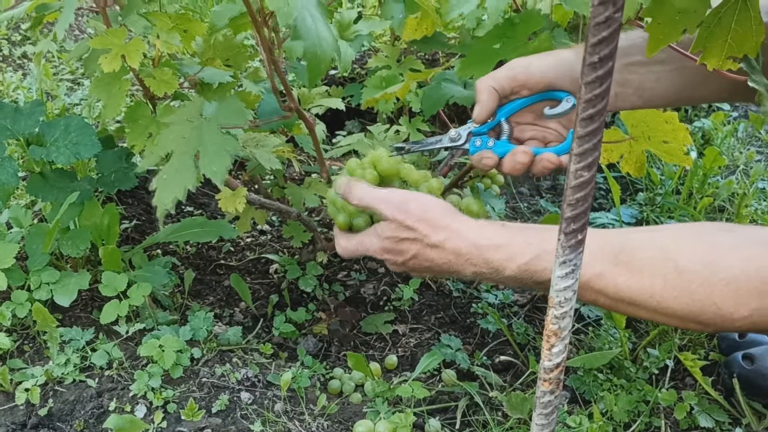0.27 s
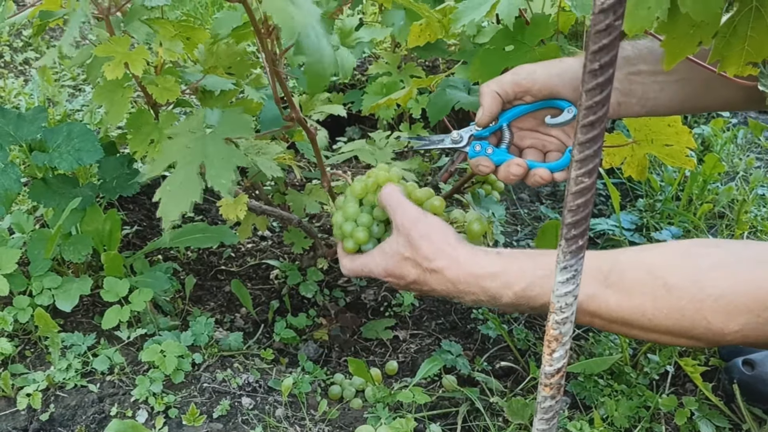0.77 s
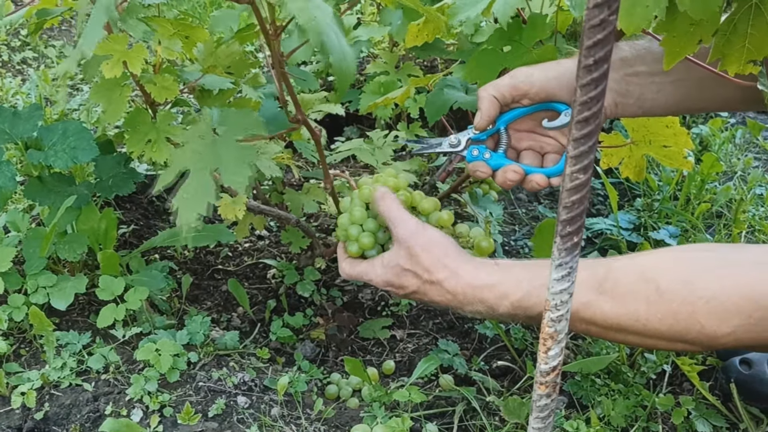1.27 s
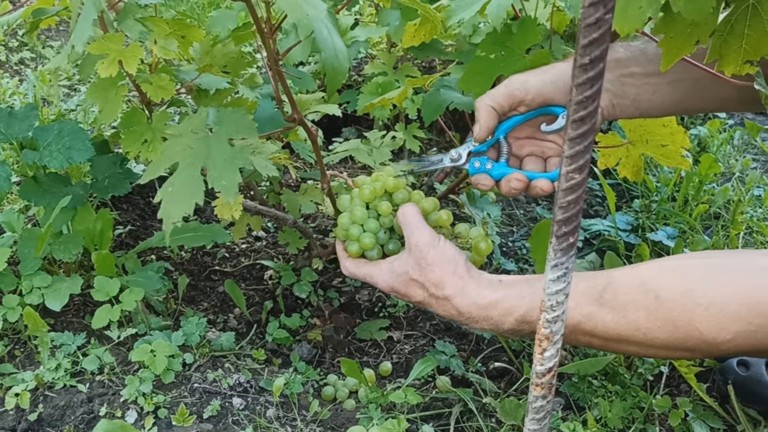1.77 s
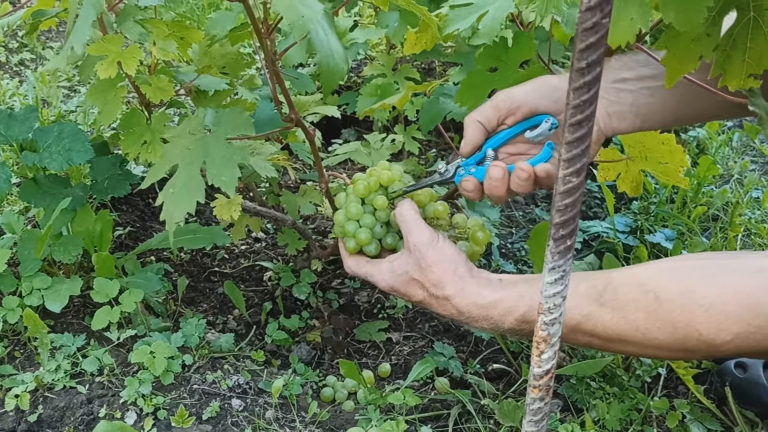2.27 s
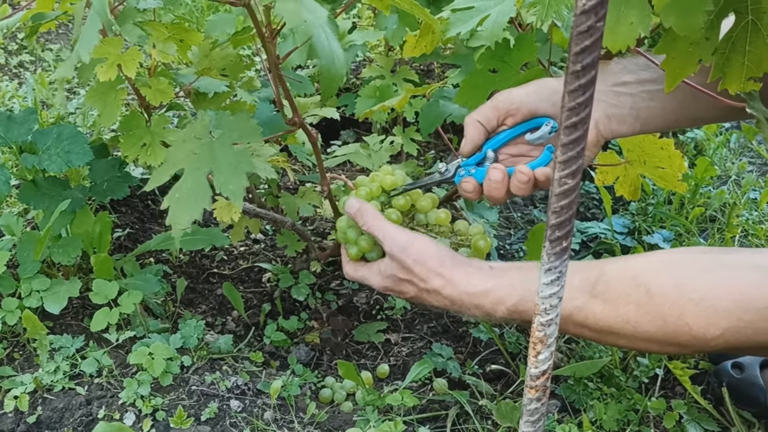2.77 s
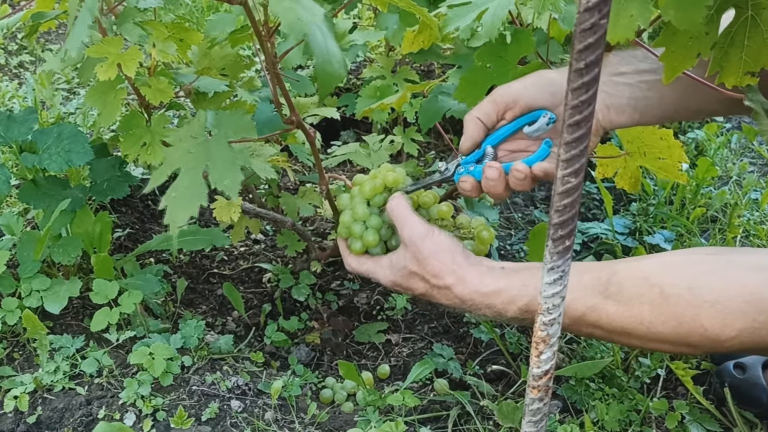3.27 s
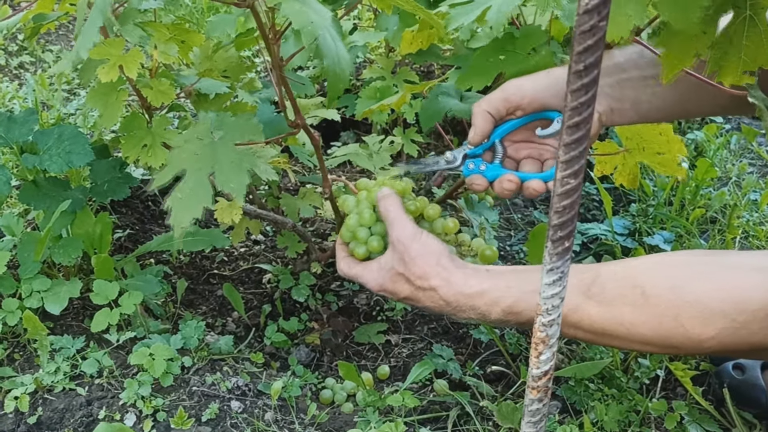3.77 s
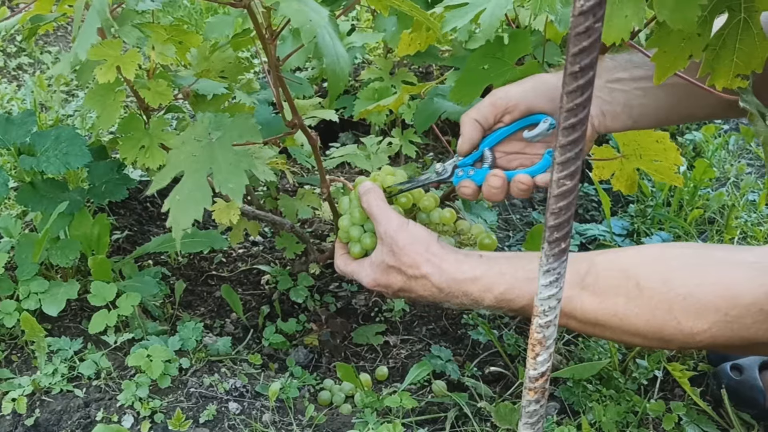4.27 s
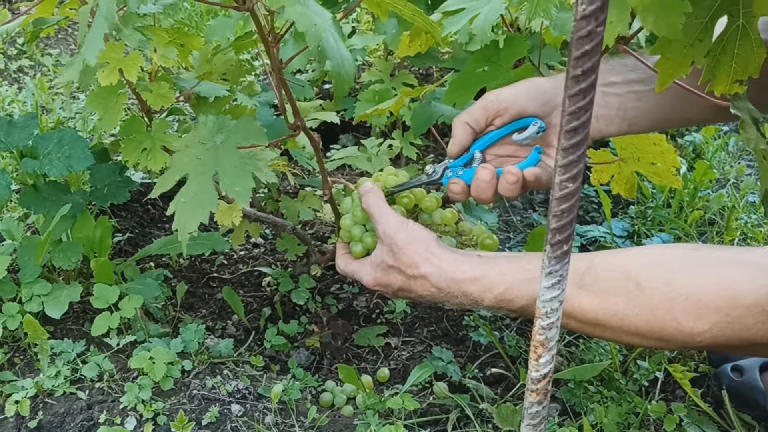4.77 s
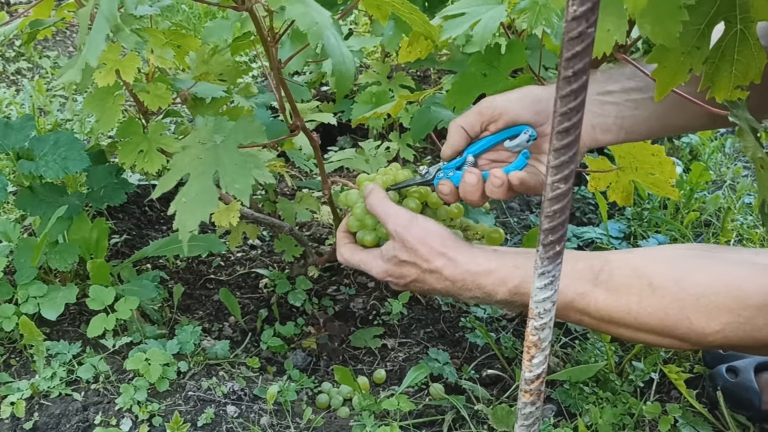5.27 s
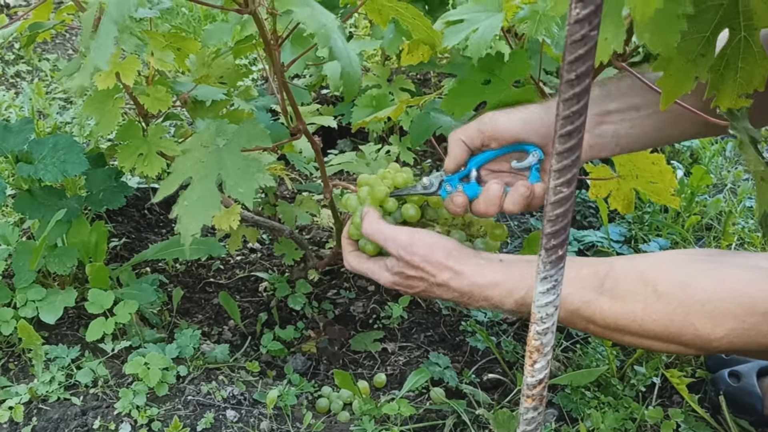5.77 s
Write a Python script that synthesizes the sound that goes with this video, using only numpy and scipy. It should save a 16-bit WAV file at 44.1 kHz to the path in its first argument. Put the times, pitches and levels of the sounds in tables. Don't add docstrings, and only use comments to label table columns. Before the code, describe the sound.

Small garden shears tick and nick faintly among grapes over distant traffic rumble and hiss, then shut with one sharp, bright metallic snip.

```python
import sys
import numpy as np
from scipy import signal
from scipy.io import wavfile
from scipy.ndimage import uniform_filter1d

SR = 44100
rng = np.random.default_rng(int(sys.argv[2]) if len(sys.argv) > 2 else 0)


def to_wav(s):
    ch = np.atleast_2d(s).T
    pcm = np.round(np.clip(ch, -1, 1) * 32767)
    wavfile.write(sys.argv[1], SR, pcm.astype(np.int16))


def nominal_scale(level):
    x = np.asarray(level, float) / 20
    return 10 ** x


N = 265261
LOW_CUT_HZ = 78


def evened(x):
    return x / np.sqrt(np.mean(x ** 2) + 1e-20)


def peaked(x):
    return x / abs(x).max()


def add(mix, s, sound):
    part = mix[round(s * SR):][:len(sound)]
    part += sound[:len(part)]


def band(x, lo_hz, hi_hz):
    return signal.sosfilt(signal.butter(2, [lo_hz, hi_hz], "band", fs=SR, output="sos"), x)


def ring(t, hz, t60):
    return np.sin(2 * np.pi * hz * t) * nominal_scale(-60 * t / t60)


# hz, density_db (dB per Hz)
AIR_SPECTRUM = [(40, -5.5), (70, 4), (93, -1), (217, -8), (455, -14), (821, -19.5), (1360, -22.5),
                (2200, -26.5), (2900, -30), (3600, -27), (4700, -30)]
# time_s, level_db
TRAFFIC_SWELL = [(0.0, -60.5), (0.6, -63), (1.42, -61), (1.56, -62.5), (4.75, -64), (6.01, -62)]


def air():
    frames, hz = N // 256 + 5, np.fft.rfftfreq(1024, 1 / SR)
    real, imaginary, patches = rng.standard_normal((frames, 513, 3)).T
    patches = uniform_filter1d(patches, size=10, axis=0)
    patches = evened(uniform_filter1d(patches, size=10, axis=1))
    spectrum_hz, density_db = np.transpose(AIR_SPECTRUM)
    swell_s, swell_db = np.transpose(TRAFFIC_SWELL)
    swell_db = np.interp(np.arange(frames) * 256 / SR, swell_s, swell_db - swell_db.mean())
    field_db = np.interp(np.log(hz + 1), np.log(spectrum_hz), density_db)[:, None] + 0.75 * patches
    field_db = field_db + swell_db / (1 + (hz[:, None] / 500) ** 2)
    spectra = (real + 1j * imaginary) * nominal_scale(field_db)
    wash = signal.istft(spectra, nperseg=1024, noverlap=768)[1][:N]
    low_cut = signal.butter(4, LOW_CUT_HZ, "high", fs=SR, output="sos")
    return nominal_scale(-60) * evened(signal.sosfilt(low_cut, wash))


def stroke(start, length, blunt):
    return np.sin(np.pi * np.clip((np.arange(N) / SR - start) / length, 0, 1)) ** blunt


# start_s, length_s, level_db
GRIPS = [
    (-.4, 2.4, -81.5),
    (.2, 0.28, -84),
    (1.98, 0.21, -81),
    (5.28, .5, -88),
    (5.7, 0.23, -76),
]
# start_s, length_s, level_db, low_share_db
SCRAPES = [(0.325, 0.16, -79, 1), (.688, 0.028, -64, 1), (1.95, 0.12, -69, -12), (2.1, 0.14, -71.5, -1),
           (3.443, 0.062, -86, -12), (3.604, 0.16, -71.5, -6), (4.33, 0.21, -85, 11),
           (5.313, 0.058, -69, -9), (5.415, .1, -72, -6), (5.702, 0.15, -63.5, 1.5), (5.819, 0.019, -70, 6),
           (5.908, 0.038, -70.5, -1), (5.949, 0.098, -60.5, -3)]


def rubbing():
    slip_size = nominal_scale(2.7 * np.minimum(rng.exponential(1, N), 5))
    slips = slip_size * rng.standard_normal(N) * (rng.random(N) < 5000 / SR)
    pressure = sum(nominal_scale(level_db) * stroke(start, length, 0.66) for start, length, level_db in GRIPS)
    out = pressure * 2.2 * evened(band(slips, 7630, 8860))
    bright = evened(band(slips, 5400, 8360))
    low = evened(band(slips, 3200, 6800))
    for start, length, level_db, low_db in SCRAPES:
        out += nominal_scale(level_db) * stroke(start, length, 0.74) * (bright + nominal_scale(low_db) * low)
    return out


def tick(db, hz, knock_db, sizzle_db, handle, low_hz):
    t = np.arange(1600) / SR
    t60 = 0.025 * np.exp(-0.012 * (db + 42))
    early = 0.13 * nominal_scale(-60 * t / 0.0039)
    late = 0.088 * nominal_scale(-60 * t / (1.3 * t60))
    tap = rng.standard_normal(len(t)) * (early + late) + (t == 0)

    def rung(modes):
        return peaked(np.convolve(tap, modes)[:len(t)])

    blade = 0.5 * rung(ring(t, hz * 0.96, 0.5 * t60) + ring(t, hz * 1.05, 0.63 * t60))
    blade += 0.84 * peaked(band(tap, 5680, 9800)) + 0.5 * rung(ring(t, 8030, 0.0048))
    knock = handle * rung(ring(t, 3720, 0.032) + 0.38 * ring(t, 4400, 0.022))
    knock += peaked(band(tap, low_hz, 7200))
    sizzle = 0.24 * rung(ring(t, 14300, 0.012) + 0.8 * ring(t, 12400, 0.013))
    sizzle += 0.74 * peaked(band(tap, 11000, 15300))
    return nominal_scale(db) * (blade + nominal_scale(knock_db + 10.5) * knock + nominal_scale(sizzle_db + 15.5) * sizzle)


# time_s, peak_db, blade_hz, handle_knock_db, sizzle_db
PIVOT_TICKS = [(0.2577, -42.5, 7040, -41, -6.5), (0.3308, -40.5, 6800, -14.5, -15),
               (0.376, -41, 6450, -19, -10), (0.406, -49, 6600, -12, -5), (0.4202, -54, 6900, -2.5, -14),
               (0.4657, -58, 7250, -0.5, -19), (0.4873, -45.5, 6530, -14, -23),
               (0.5297, -60, 7340, -7, -22), (0.622, -40.5, 6670, -13.5, -20),
               (0.6963, -53, 6800, -19, -24), (3.1416, -36, 7060, -15.5, -20),
               (3.1645, -36.5, 7130, -19, -22), (5.1434, -56, 6360, -5.5, -26),
               (5.323, -46, 6300, -14, -19), (5.3337, -37.5, 6400, -18, -16),
               (5.345, -39.5, 6100, -13, -15), (5.388, -39, 8040, -33, -21)]


def pivot_ticks():
    out = np.zeros(N)
    for s, *row in PIVOT_TICKS:
        add(out, s + 0.00068, tick(*row, handle=0.37, low_hz=3380))
    return out


# time_s, peak_db
TOUCHES = [(0.6764, -61), (1.3533, -59), (1.5125, -57), (1.6194, -60), (1.9659, -56), (2.0994, -55),
           (2.2644, -57), (3.489, -60), (4.373, -58), (4.4614, -64), (4.8294, -59), (5.0344, -65),
           (5.7018, -57), (5.896, -54)]


def tip_touches():
    out = np.zeros(N)
    for s, db in TOUCHES:
        add(out, s + 0.0004, tick(db, hz=7020, knock_db=-10.5, sizzle_db=-21, handle=0.08, low_hz=2000))
    return out


# time_s, level_db, contact_ms
DROPS = [
    (.986, -43.5, 0.12),
    (1.0478, -37.5, 0.23),
    (3.223, -50, 0.6),
    (3.291, -50, 0.65),
]
# delay_ms, level_db, contact_stretch (below 0 flips the sign)
SOIL_RETURNS = [(.95, -11, .9), (2.05, -5, .8), (3.6, -6, 1.1), (3.3, -10, 5.0), (8, -15, -9.0)]


def drop(db, ms):
    t = np.arange(-40, 2600) / SR * 1000

    def push(delay, stretch):
        return np.sign(stretch) * np.exp(-abs((t - delay) / (ms * stretch)) ** 2.2)

    returns = sum(nominal_scale(return_db) * push(delay, stretch) for delay, return_db, stretch in SOIL_RETURNS)
    settling = (t > 0) * (0.092 * np.exp(-t / 4) + 0.04 * np.exp(-t / 30))
    crumbs = evened(band(rng.standard_normal(len(t)), 840, 3000)) * settling
    return nominal_scale(db) * (push(0, 1) - returns + crumbs)


def berry_drops():
    out = np.zeros(N)
    for s, *row in DROPS:
        add(out, s - 40 / SR, band(drop(*row), LOW_CUT_HZ / 2, 2400))
    return out


# time_s, peak_db, blade_hz, knock_db, sizzle_db
NICKS = [(2.0023, -53.5, 7500, -20, -20), (2.0786, -50.5, 6660, -7, -29), (2.163, -32, 6930, -21, -14.5),
         (2.1779, -46, 6680, -13, -25), (2.1841, -42, 7370, -11.5, -25), (2.1873, -42, 6920, -17, -26),
         (2.31, -49.5, 7200, -9.5, -24), (2.938, -34.5, 6900, -50, -15.5), (3.3948, -49.5, 7100, -18, -25),
         (4.0763, -55.5, 6100, -4, -22), (4.7616, -41.5, 7500, -19, -25), (4.7935, -39, 7300, -16, -18),
         (5.475, -54.5, 7050, -2.5, -22), (5.5019, -50, 7950, -19, -19), (5.8234, -49, 7440, -5, -30),
         (5.9658, -48, 6760, -24.5, -25), (5.9802, -45, 6900, -23, -24), (5.9974, -49, 7600, -15, -11)]
# time_s, peak_db, blade_hz, knock_db, sizzle_db
STEM_BITES = [
    (5.741, -45, 6750, -14, -26),
    (5.7496, -39, 6750, -5, -8),
]


def nicks():
    out = np.zeros(N)
    for s, *row in [*NICKS, *STEM_BITES]:
        add(out, s + 0.0004, tick(*row, handle=0.033, low_hz=2000))
    return out


# time_s, slip_rate_hz, level_db, first_harmonic_db
SQUEAK = [
    (3.589, 1760, -81, -12),
    (3.6, 1707, -69, -7),
    (3.64, 1715, -73, -8),
    (3.67, 1720, -74, -13),
    (3.69, 1736, -67.5, 2),
    (3.715, 1713, -69, -7),
    (3.736, 1680, -80, 7),
]


def squeak():
    s, *columns = np.transpose(SQUEAK)
    t = np.arange(s[0], s[-1], 1 / SR)
    hz, db, first_db = (np.interp(t, s, column) for column in columns)
    wobble, flutter = (evened(uniform_filter1d(rng.standard_normal(len(t)), size=150)) for _ in range(2))
    turn = 2 * np.pi * np.cumsum(hz * (1 + 0.0246 * wobble)) / SR
    stack = nominal_scale(first_db) * np.sin(turn) + np.sin(2 * turn)
    stack += 0.15 * np.sin(3 * turn) + 0.33 * np.sin(4 * turn)
    out = np.zeros(N)
    add(out, s[0], nominal_scale(db + 3.3 * flutter) * stack)
    return out


# time_s, strength_db, crack_share (0-1), edge_ring_db
BLOWS = [
    (5.77035, -5, .6, -18),
    (5.7714, -11, .1, -12),
    (5.7727, -1, .06, 0),
    (5.77333, -1.5, .08, -8),
]
# hz, level_db, t60_s
HANDLE_MODES = [(943, -31, 0.033), (1810, -52, 0.019), (2280, -35.5, .03)]
# hz, level_db, t60_s
BLADE_MODES = [(3760, 1.5, 0.044), (4270, -8, 0.057), (5285, 11, .035), (6340, -3, .04), (6900, -7, .035),
               (7360, -5, 0.05), (7640, -3, 0.04), (8500, 1, 0.047), (11700, -5, .02), (13170, -13, 0.039),
               (14800, -11, .02)]


def snip():
    t, out = np.arange(5000) / SR, np.zeros(N)
    chatter = [(5.7744 + k * 0.0017, -5 - 7 * k, 0.073, -13) for k in range(6)]
    clash = 0.78 * ring(t, 6870, 0.0068) + 1.82 * ring(t, 8200, 0.006)
    edge = ring(t, 12140, 0.007) + 0.94 * ring(t, 12900, 0.0028) + 0.67 * ring(t, 16000, 0.003)
    crack = np.exp(-(t / 0.00004 - 2) ** 2) - 0.21 * np.exp(-t / 0.00033)
    for s, db, share, edge_db in [*BLOWS, *chatter]:
        blow = share * 0.4 * crack + (1 - share) * clash + 0.62 * nominal_scale(edge_db) * edge
        add(out, s, nominal_scale(-10.5 + db) * blow)
    shut_ring = sum(nominal_scale(db) * ring(t, hz, t60) for hz, db, t60 in BLADE_MODES)
    add(out, 5.7728, nominal_scale(-16.5) * peaked(shut_ring))
    handle_ring = sum(nominal_scale(db) * ring(t, hz, t60) for hz, db, t60 in HANDLE_MODES)
    add(out, BLOWS[0][0], handle_ring)
    out = band(out, 180, 19000)
    echo = rng.standard_normal(len(t)) * nominal_scale(-60 * t / 0.072) * (1 - np.exp(-t / 0.0015))
    echo = band(echo, 2200, 16000)
    echo = echo / np.linalg.norm(echo)
    return out + nominal_scale(-14.5) * signal.oaconvolve(out, echo)[:N]


def scene():
    mix = air() + rubbing() + pivot_ticks() + tip_touches()
    mix += berry_drops() + nicks() + squeak() + snip()
    return mix[None]


def band_limit(x):
    return signal.sosfilt(signal.butter(12, 16970, fs=SR, output="sos"), x)


EDGES_HZ = [980, 4780, 6150, 7700, 8570, 11600, 12950, 17500]
BANDS_DB = [0.5, -1.5, -6, 2.5, -6, -18, -6.5, -3.5]


def record(dry):
    gains = nominal_scale(BANDS_DB)
    steps = gains - np.append(gains[1:], 0)
    n = np.arange(-730, 731)
    taps = sum(step * 2 * hz / SR * np.sinc(2 * hz / SR * n) for hz, step in zip(EDGES_HZ, steps))
    taps = taps * np.kaiser(len(n), 0.8)
    limit = signal.firwin(701, 15790, window=("kaiser", 4.5), fs=SR)
    limit = limit + nominal_scale(-30) * signal.unit_impulse(701, "mid")
    mix = signal.oaconvolve(dry, np.convolve(taps, limit)[None], "same")
    return band_limit(mix)


dry = scene()
out = record(dry)
to_wav(out)
```